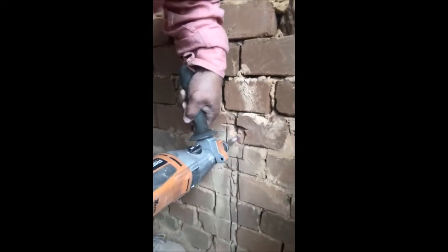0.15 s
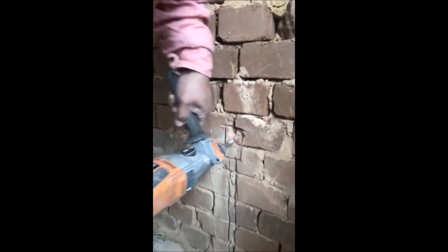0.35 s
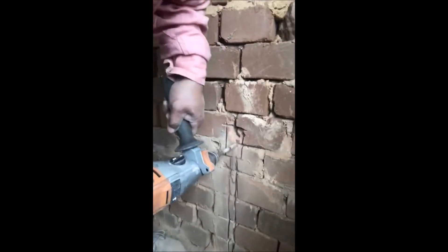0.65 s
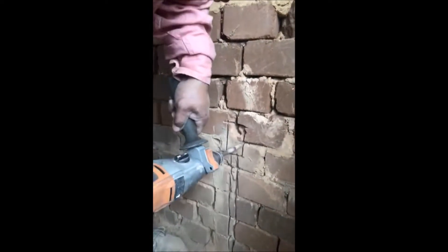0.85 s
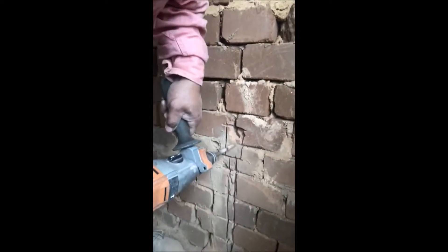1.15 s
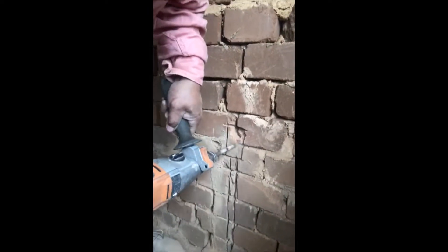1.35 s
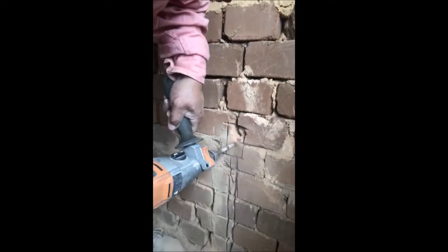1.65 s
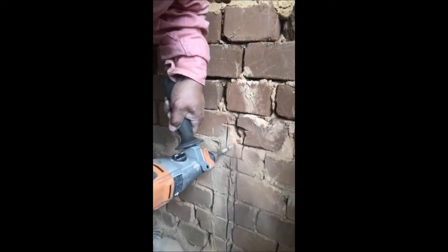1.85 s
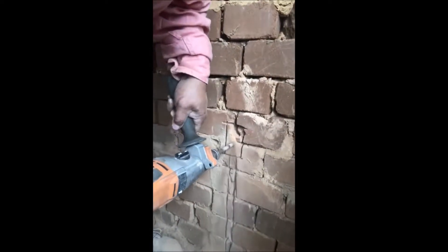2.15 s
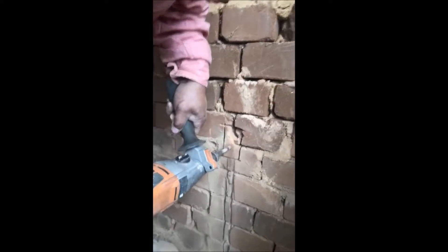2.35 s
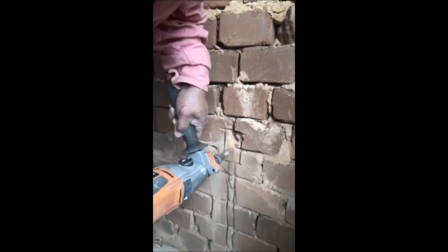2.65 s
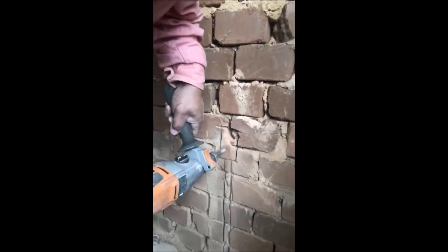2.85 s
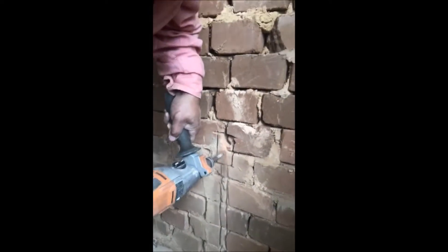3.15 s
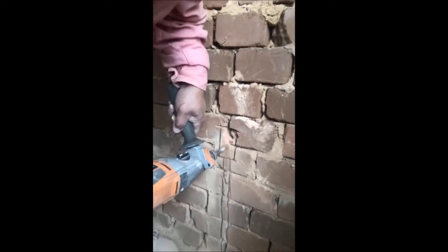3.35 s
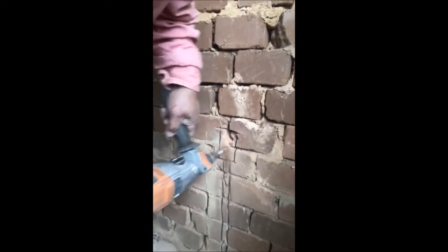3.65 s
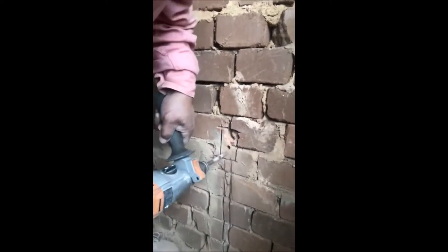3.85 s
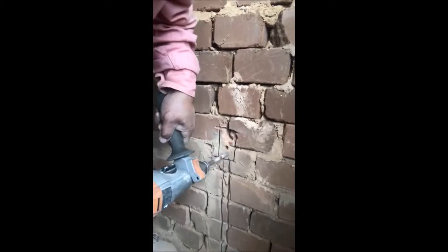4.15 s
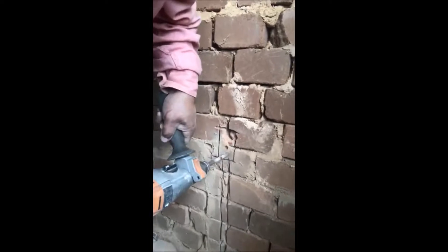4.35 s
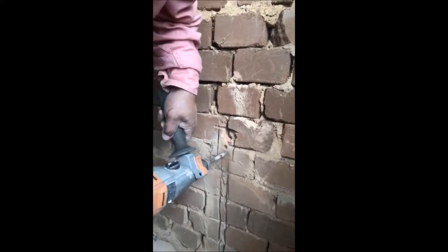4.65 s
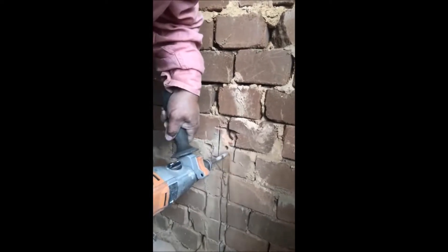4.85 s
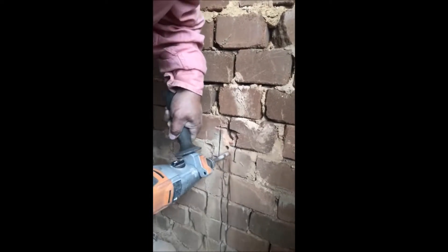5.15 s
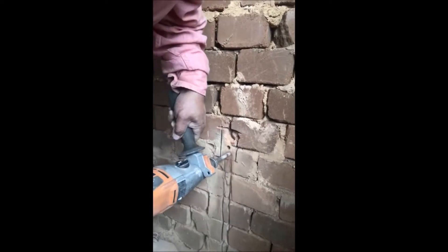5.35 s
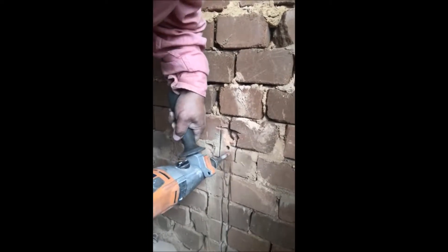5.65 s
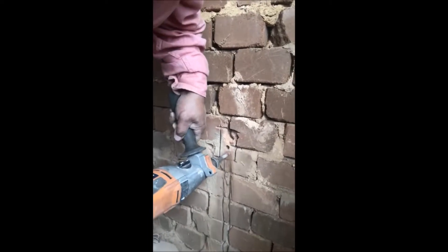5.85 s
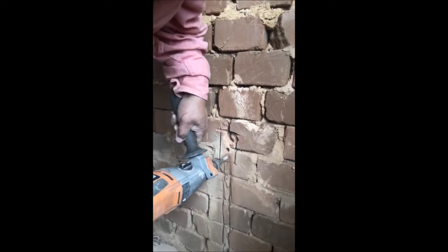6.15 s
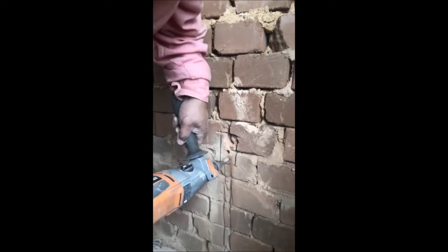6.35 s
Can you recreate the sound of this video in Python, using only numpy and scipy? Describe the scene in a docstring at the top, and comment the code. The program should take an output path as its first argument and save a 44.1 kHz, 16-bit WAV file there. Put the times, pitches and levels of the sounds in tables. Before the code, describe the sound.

A hammer drill bores into brick in harsh rattling bursts of steely clicks and grit, twice easing off to a free-running motor whine.

```python
"""A corded hammer drill bores into a brick wall, close to a small mono microphone.
The bit rattles in bursts of ringing steel clicks amid puffs of grit, about forty bursts a second in
steady boring. The armature sings in sine orders of its speed over coloured noise from housing, gears and
fan. Twice the bit is drawn back and the motor runs free. Hum, low rumble and a soft groan lie beneath."""
import sys
import numpy as np
from scipy import signal
from scipy.io import wavfile
from scipy.ndimage import uniform_filter1d

SR = 44100
rng = np.random.default_rng(int(sys.argv[2]) if len(sys.argv) > 2 else 0)


def makeup_ratio(level_db):
    """Linear amplitude ratio for a level in decibels (20 dB per factor of ten)."""
    decades = np.asarray(level_db, float) / 20
    return 10 ** decades


def store_wav(level_fs):
    """Save 16-bit WAV to argv[1]."""
    pcm = np.round(np.clip(np.atleast_2d(level_fs), -1, 1) * 32767)
    wavfile.write(sys.argv[1], SR, pcm.T.astype(np.int16))


N = 287091

# Single knocks as the bit bounces, rattles in parted bursts or grazes the hole: (time [s], strength [dB])
KNOCKS = [(0.0002, -11), (0.004, -7), (0.0094, -13), (0.0122, -10), (0.0153, -10), (0.0261, -7),
          (0.0286, -7), (0.0326, -11), (0.0438, -7), (0.0493, -6), (0.0532, -10), (0.0599, -7),
          (0.0639, -6), (0.07, -7), (0.0754, -6), (0.078, -6), (0.0808, -12), (0.0883, -5), (0.0922, -7),
          (0.1, -6), (0.1027, -6), (0.1104, -11), (0.113, -8), (0.1233, -6), (0.1259, -9), (0.1313, -13),
          (0.1353, -10), (0.1482, -6), (0.152, -7), (0.1549, -12), (0.1602, -12), (0.1717, -6),
          (0.1769, -10), (0.1847, -8), (0.2006, -6), (0.2032, -4), (0.2072, -8), (0.219, -6), (0.2215, -6),
          (0.228, -8), (0.2386, -6), (0.2491, -7), (0.2517, -12), (0.2558, -11), (0.2585, -10),
          (0.2727, -7), (0.2767, -7), (0.2794, -7), (0.2872, -12), (0.2897, -7), (0.3002, -6),
          (0.3054, -13), (0.3084, -11), (0.325, -6), (0.3362, -11), (0.5209, -11), (0.5465, -12),
          (0.5525, -14), (0.5581, -14), (0.5635, -15), (1.5134, -6), (1.5339, -7), (1.5367, -8),
          (1.5402, -7), (1.5606, -9), (1.5835, -5), (1.5886, -7), (1.6052, -4), (1.6096, -6), (1.6242, -7),
          (1.6283, -7), (1.6395, -5), (1.6536, -5), (1.6574, -4), (1.6612, -6), (1.6727, -6), (1.6784, -6),
          (1.6816, -3), (1.6919, -10), (1.6952, -5), (1.7099, -6), (1.7151, -8), (1.7277, -7), (1.7344, -8),
          (1.7469, -7), (1.7514, -7), (1.7566, -10), (1.7643, -9), (1.7695, -8), (1.7798, -10),
          (1.7826, -6), (1.7865, -6), (2.9138, -4), (2.924, -5), (2.9347, -11), (2.9436, -6), (2.9482, -6),
          (2.9681, -5), (2.9837, -9), (2.9908, -3), (2.9937, -12), (3.0149, -4), (3.0265, -13),
          (3.0304, -12), (3.0407, -5), (3.0538, -10), (3.064, -2), (3.1183, -14), (3.1337, -7),
          (3.1397, -10), (3.1627, -7), (3.1702, -4), (3.1943, -13), (3.2157, -10), (3.2195, -6),
          (3.3237, -7), (3.3319, -4), (3.364, -6), (3.3768, -3), (3.4094, -8), (3.4222, -5), (3.432, -11),
          (3.4534, -4), (3.4644, -12), (3.4769, -9), (3.5012, -4), (3.5123, -7), (3.5199, -6), (3.5236, -3),
          (3.5448, -7), (3.5475, -6), (3.5556, -11), (3.566, -3), (3.5695, -13), (3.5762, -12), (3.588, -5),
          (4.2704, -12), (4.4696, -5), (4.4805, -10), (4.4941, -10), (4.5093, -7), (4.518, -5),
          (4.5384, -11), (4.5578, -6), (4.5689, -6), (4.5718, -11), (4.5765, -4), (4.5793, -7),
          (4.5827, -6), (4.594, -5), (4.605, -11), (4.614, -4), (4.6291, -6), (4.6417, -7), (4.6476, -7),
          (4.6502, -10), (4.6541, -6), (4.6654, -7), (4.6697, -11), (4.6753, -4), (4.6864, -5),
          (4.6976, -4), (4.7088, -4), [5.3276, -6], [5.3314, -4], [5.3377, -3], [5.3427, -4], [5.3529, -6],
          [5.3584, -6], [5.3622, -5], [5.3667, -5], [5.3758, -7], [5.3795, -4], [5.3846, -4], [5.3896, -5],
          [5.4012, -5], [5.4045, -4], [5.4091, -3], [5.4138, -4], [5.4228, -7], [5.4266, -5], [5.4306, -4],
          [5.4386, -9], [5.4469, -4], [5.4521, -4], [5.4575, -4], [5.465, -9], [5.4701, -4], [5.4752, -8],
          [5.4789, -6], [5.4842, -3], [5.4893, -5], [5.4956, -3], [5.5022, -8], [5.5072, -4], [5.52, -4],
          [5.5324, -4], [5.5392, -4], [5.5483, -8], [5.5516, -4], [5.5599, -6], [5.5689, -5], [5.5798, -7],
          [5.5827, -6], [5.5873, -3], [5.596, -8], [5.5998, -3], [5.6037, -4], [5.6093, -5], [5.6191, -6],
          [5.6228, -7], [5.6268, -8], [5.6303, -5], [5.6357, -5], [5.6447, -4], [5.6537, -5], [5.6588, -5],
          [5.6641, -5], [5.6679, -4], [5.673, -6], [5.6781, -4], [5.6897, -4], [5.7001, -4], [5.7039, -5],
          [5.709, -5], [5.718, -4], [5.7247, -8], [5.7287, -5], [5.7412, -6], [5.7461, -7], [5.7518, -5],
          [5.7566, -3], [5.7669, -5], [5.773, -3], [5.7773, -4], [5.7822, -4], [5.7961, -5], [5.8015, -7],
          [5.804, -5], [5.8117, -5], [5.8168, -5], [5.8194, -12], [5.8232, -11], [5.8282, -5], [5.8434, -6],
          [5.8468, -5], [5.8495, -7], [5.853, -6], [5.8613, -11], [5.8639, -5], [5.868, -9], [5.8728, -7],
          [5.8797, -8], [5.8906, -6], [5.8944, -5], [5.8982, -12], [5.9021, -5], [5.9137, -6], [5.9185, -5],
          [5.9222, -6], [5.9277, -10], [5.9366, -12], [5.94, -5], [5.9452, -5], [5.9494, -7], [5.9545, -12],
          [5.9582, -4], [5.9648, -6], [5.97, -5], [5.9837, -5], [5.9888, -5], [5.995, -8], [6.0104, -6],
          [6.013, -4], [6.0179, -5], [6.0373, -6], [6.0398, -9], [6.0473, -6], [6.0587, -5], [6.0634, -9],
          [6.0701, -6], [6.0827, -4], [6.0863, -6], [6.0928, -5], [6.1118, -6], [6.1155, -6], [6.132, -5],
          [6.1353, -5], [6.1408, -5], [6.1524, -9], [6.1597, -6], [6.1698, -7], [6.1785, -11], [6.1812, -5],
          [6.1872, -6], [6.2046, -5], [6.209, -5], [6.2161, -5], [6.2201, -12], [6.2276, -6], [6.2326, -6],
          [6.24, -7], [6.2513, -7], [6.26, -7], [6.2726, -10], [6.2772, -6], [6.2824, -6], (6.3021, -5),
          (6.3074, -2), (6.3111, -4), (6.3287, -4), (6.3348, -5), (6.3461, -3), (6.3498, -4), (6.3585, -11),
          (6.3747, -4), (6.3796, -2), (6.3969, -5), (6.4018, -3), (6.4216, -6), (6.4427, -4), (6.4701, -4),
          (6.4751, -3), (6.4948, -11), (6.5, -4)]
# Blows: (time [s], strength [dB], extra ring of the free shank [dB], share of stroke in contact [0-1],
# extra ring of the bit tip [dB])
BLOWS = [(0, -6, 3, .9, -6), (.34, -6, 3, .65, -3), (1.5, -6, -14, 0.57, -4), (1.8, -6.5, -4.5, 0.98, -2.5),
         (2.1, -7, -2.5, 0.96, -1), (2.4, -5.5, 0.5, 0.85, -0.5), (2.8, -7.5, 2.5, 0.85, -1),
         (2.93, -5, 2, 0.41, 1), (3.6, -7, 0.5, 0.59, 2), (4.5, -6, -3, .6, 3), (4.7, -6.5, -16, 0.73, 0.5),
         (5.0, -6, -3, 0.91, -3), (5.4, -6.5, 1.5, .78, -1.5), (5.65, -5.5, 1.5, 0.8, -2.5),
         (5.8, -4, 3, 0.75, 1), (6.1, -6.5, 2.5, 0.54, -0.5), (6.3, -3.5, 0.5, 0.6, 0),
         (6.51, -5.5, -1, .3, 2.5)]
# The bit chatters with hardly a pause: (start [s], end [s])
RATTLES = [(1.79, 2.9), (4.715, 5.325)]
# Clearly parted bursts of the boring bit: (start [s])
BURST_STARTS = [1.844, 1.864, 1.966, 2.159, 2.242, 2.337, 2.3912, 2.4165, 2.4439, 2.4651, 2.487, 2.5103,
                2.5415, 2.561, 2.5881, 2.6154, 2.6449, 2.6826, 2.7137, 2.7303, 2.7601, 2.7928, 2.8124,
                2.839, 2.8612, 2.88, 4.7212, 4.7425, 4.7639, 4.8053, 4.8304, 4.8803, 4.9074, 4.9275, 4.951,
                4.9697, 4.9952, 5.0431, 5.0708, 5.0908, 5.1161, 5.1376, 5.181, 5.2115, 5.2298, 5.2552,
                5.2746, 5.3013]
# Ringing modes of bit, chuck and brick: (frequency [Hz], level [dB], t60 [s], swing over one stroke [dB],
# place in the stroke where the swing peaks [0-1])
STEEL_MODES = [(641, -4.5, 0.013, 1.5, .4), (2070, -9, 0.0097, 2.5, 0.03), (2354, -4.5, 0.0097, -0.3, 0.2),
               (2533, 0, 0.0092, 1.8, .22), (3135, -6, 0.016, 4.5, 0.29), (3226, -7.5, 0.029, 4.5, 0.37),
               (3855, -2.5, 0.0084, 1.5, 0.83), (4290, -3, 0.0078, 2.5, 0.83),
               (4550, -2, 0.0057, -0.5, 0.8), (5900, -5, 0.0058, 8, .41), (6330, -6, 0.0076, 7, 0.37),
               (8930, -5.5, 0.0041, 0.5, 0.2)]
# Armature: (time [s], mean speed [turns/s])
SPEED = [(0, 425), (.3, 424), (.5, 447), (.7, 424), (.88, 401), (1.1, 435), (1.65, 436), (1.8, 427),
         (2.2, 424), (2.7, 427), (3.0, 429), (3.6, 448), (4.05, 450), (5.0, 447), (5.6, 432), (5.75, 432),
         (6.3, 444), (6.51, 448)]
# Motor: (time [s], bit load [0-1], motor noise [dB], fourth-order whine [dB])
MOTOR = [(0, 0.7, -35, -42), (.32, 0.6, -34, -41), (.4, 0.17, -33, -37), (.55, 0.24, -32.5, -40),
         (.63, 0.03, -35.5, -53), (.9, 0.3, -34, -54), (1.06, 0.08, -31.5, -45), (1.3, 0.08, -29.8, -41),
         (1.47, 0.1, -28, -33.5), (1.52, 0.8, -28.5, -33), (1.62, 1, -28.5, -39), (1.8, 1, -36, -45),
         (2.8, 0.57, -33.5, -40.5), (2.97, 0.34, -32, -36.5), (3.6, 0.17, -32.5, -35.5),
         (4.05, 0, -30.5, -42), (4.45, 0.06, -29.5, -34.5), (4.7, 0.74, -33.5, -39), (5.2, 0.66, -34, -50),
         (5.85, 0.8, -32.5, -36), (6.25, 0.99, -32, -42), (6.51, 0.4, -30, -35)]
# Bit held hard against the brick: (start [s], end [s])
BORES = [(1.79, 2.93), (4.715, 6.295)]
# The second and third shaft orders sing: (start [s], end [s])
STEADY = [(1.05, 1.55), (3.1, 4.65)]
# Colour of the housing roar: (frequency [Hz], relative density [dB per Hz])
ROAR = [(800, -30), (1000, -3), (1120, 1), (1350, 3), (2600, -12.5), (3380, -35), (5720, -120)]
# Colour of the low drone: (frequency [Hz], relative density [dB per Hz])
DRONE = [(88, -72), (150, -21), (394, -8.5), (480, -3.5), (640, 0.5), (780, -2), (930, -6), (1150, -18)]
# Colour of the gear hiss: (frequency [Hz], relative density [dB per Hz])
GEARS = [(1120, -4.5), (1900, 1.5), (2300, -4), (2710, 1), (3000, -0.5), (3350, 0.1), (3800, -1.5),
         (4700, 1), (5450, -4), (6000, -4), (8000, -10.5), (10400, -58), (17600, -120)]
# Colour of the fan hiss: (frequency [Hz], relative density [dB per Hz])
FAN = [(4120, -10), (7000, 0), (9490, -2.5), (10000, -1.5), (11000, -6.5), (12000, -5.5), (13300, -7.5),
       (16000, -10.5)]
# Low rumble swells as the grip shifts: (middle [s], half width to 1/e [s], peak boost [dB])
SWELLS = [(0.519, 0.22, 5), (3.951, 0.25, 3)]
# Supply hum, running free at a motor noise of -31 dB: (frequency [Hz], level [dB rms])
HUM = [(60, -62), (120, -66), (240, -54)]
# Groan tones: (start frequency [Hz], end frequency [Hz])
GROAN_HZ = [(300, 268), (225, 198)]

# Striker and bit
TURNS_PER_STROKE = 10.545  # armature turns for one stroke of the striker
CONTACT_MIDDLE = .35  # middle of the contact, share of a stroke
RATTLE_GAP_S, GAP_SPREAD = .0047, .27  # median gap between clicks; its log spread
START_SPREAD, SHARE_SPREAD = .05, .05  # of burst starts; of the contact share; both in strokes
SIZE_SPREAD_DB = 1.3  # from click to click
PARTING_S, SHORTEST_S = .005, .002  # pause kept before a parted burst; no burst is cut shorter than this
SHANK_HZ, TIP_ABOVE_HZ = 3170, 5500
PHASE_SPREAD = .45  # radians by which a mode's start differs from click to click
CRACK_DB, CRACK_S = -11.5, .00006  # bare pressure spike of each impact; its half width
SHAKE_DB = 7.5  # swing of the motor sound between contact and return, at full load

# Motor layers: (dB above the motor noise running free, dB lost at full load)
UNBALANCE, HOUSING, GEARBOX = (-8, 7), (-0.29, 2.53), (3.83, 2)
BLADES, HANDS = (-3.5, 16), (-22, 5.5)
SECOND_DB, THIRD_DB = -6.5, 0  # orders, relative to the unbalance level
MESH_ORDER, MESH_DB, MESH_WAVER_DB = 1.803, -43.5, 2  # gear tooth tone: order, mean level, slow wavering
DRONE_DB, DRONE_FOLLOWS = -37.5, .7  # level at a motor noise of -31.5 dB; share of its changes taken over
GEARS_DB_PER_TURN, REFERENCE_SPEED = -0.01, 441.5  # hiss change per turn/s above this speed [turns/s]
GRAIN_DB = 0.86  # fast unevenness of the gear hiss
GROAN_START_S, GROAN_END_S, GROAN_DB = 3.5, 3.7, -45


def seconds():
    """Time of every sample in seconds."""
    return np.arange(N) / SR


def read(points, hz):
    """Spectrum in dB on a log-frequency axis."""
    f, value = np.transpose(points)
    return np.interp(np.log(hz + 1), np.log(f + 1), value, left=-90, right=-90)


def columns(rows):
    """Every column of a table after the time, as a curve over all samples."""
    s, *rest = np.transpose(rows)
    return [np.interp(seconds(), s, c) for c in rest]


def evened(x):
    """Scales to rms 1."""
    return x / np.sqrt(np.mean(x ** 2) + 1e-20)


def drift(span_s):
    """Smoothed chance of rms 1, slower for a longer span."""
    width = max(int(span_s * SR), 1)
    once = uniform_filter1d(rng.standard_normal(N), width)
    return evened(uniform_filter1d(once, width))


def noise(points, patchy_db):
    """Noise of rms 1: random short-time spectra of a given colour with drifting patches."""
    frames, hz = N // 256 + 5, np.fft.rfftfreq(1024, 1 / SR)
    real, imaginary, patches = rng.standard_normal((frames, 513, 3)).T
    patches = uniform_filter1d(patches, size=8, axis=0)
    patches = evened(uniform_filter1d(patches, size=8, axis=1))
    spectra = (real + 1j * imaginary) * makeup_ratio(read(points, hz)[:, None] + patchy_db * patches)
    return evened(signal.istft(spectra, nperseg=1024, noverlap=768)[1][:N])


def during(spans):
    """1 inside the spans, 0 outside, with soft edges."""
    t = seconds()
    inside = sum(1. * (t > start) * (t < end) for start, end in spans)
    return uniform_filter1d(inside, size=2000)


def bit_load():
    """Load on the bit, 0 running free to 1 pressed hard."""
    return np.clip(columns(MOTOR)[0], 0, 1)


def follower(rule):
    """Level in dB of a layer tied to the motor noise and damped by load."""
    above_db, lost_db = rule
    return columns(MOTOR)[1] + above_db - lost_db * bit_load()


def stroke_count():
    """Strokes of the striker made so far, geared down from the armature, at every sample."""
    return np.cumsum(columns(SPEED)[0]) / SR / TURNS_PER_STROKE


def impacts():
    """Bursts of clicks once a stroke in the rattling spans, plus single knocks: sample places and sizes."""
    strokes, t = stroke_count(), seconds()
    number = np.arange(int(strokes[-1]))
    middle_s = np.interp(number + CONTACT_MIDDLE, strokes, t)
    stroke_s = np.gradient(middle_s)
    blow_db, _, share, _ = (np.interp(middle_s, t, c) for c in columns(BLOWS))
    luck = rng.standard_normal((len(number), 8))
    length_s = np.clip(share + SHARE_SPREAD * luck[:, 7], .05, 1) * stroke_s
    gaps_s = RATTLE_GAP_S * np.exp(GAP_SPREAD * luck[:, 1:7])
    into_s = np.cumsum(gaps_s, axis=1) - gaps_s[:, :1]
    start_s = middle_s + START_SPREAD * stroke_s * luck[:, 0] - length_s / 2

    # a stroke close to a parted burst starts exactly with it
    parted_s = np.array(BURST_STARTS)
    nominal_s = middle_s - share * stroke_s / 2
    nearest_s = parted_s[abs(nominal_s[:, None] - parted_s).argmin(axis=1)]
    parted = abs(nearest_s - nominal_s) < stroke_s / 2
    start_s = np.where(parted, nearest_s, start_s)
    room_s = np.diff(start_s, append=N / SR) - PARTING_S * np.append(parted[1:], 0)
    length_s = np.minimum(length_s, np.maximum(room_s, SHORTEST_S))

    click_s = start_s[:, None] + into_s
    size = makeup_ratio(blow_db[:, None] + SIZE_SPREAD_DB * rng.standard_normal(click_s.shape))
    size = size * np.clip((length_s[:, None] - into_s) / .002, 0, 1)  # clicks weaken in the last 2 ms
    size = size * sum((click_s > start) & (click_s < end) for start, end in RATTLES)
    knock_s, knock_db = np.transpose(KNOCKS)
    all_s, all_sizes = np.append(click_s, knock_s), np.append(size, makeup_ratio(knock_db))
    return np.clip(np.round(all_s * SR).astype(int), 0, N - 1), all_sizes


def ringing_steel(at, sizes):
    """Decaying modes of bit, chuck and brick, each struck with its own strength and phase."""
    _, shank_db, _, tip_db = (c[at] for c in columns(BLOWS))
    t, steel, strokes = np.arange(2000) / SR, np.zeros(N), stroke_count()[at]
    luck = rng.standard_normal((len(at), len(STEEL_MODES), 2))
    for k, (hz, db, t60, swing_db, best) in enumerate(STEEL_MODES):
        own_db = 1.6 * luck[:, k, 0]
        own_db += shank_db * (abs(hz - SHANK_HZ) < 200) + tip_db * (hz > TIP_ABOVE_HZ)
        own_db += swing_db * np.cos(2 * np.pi * (strokes - best))  # the striker's place decides which parts ring
        strikes = np.zeros(N, complex)
        np.add.at(strikes, at, sizes * makeup_ratio(own_db) * np.exp(1j * PHASE_SPREAD * luck[:, k, 1]))
        rise = (1 - np.exp(-t * hz ** 2 / 707.0)) ** 2  # heavy, low modes are slow to get going
        ring = rise * makeup_ratio(db - 60 * t / t60) * np.exp(2j * np.pi * hz * t)
        steel += signal.oaconvolve(strikes, ring)[:N].imag
    return steel


def crushed_grit(train, lag):
    """A puff of coloured noise around each impact: scrape before, crumbs after."""
    shape = np.where(lag < 0, .25 * np.exp(lag / .0015), np.exp(-lag / .0012))
    grit = noise([(200, -8.5), (600, -21), (1500, -30.0), (2300, -2.0), (4300, 4.0), (6300, 3.5),
                  (8000, -11), (15500, -34)], patchy_db=1.5)
    return signal.oaconvolve(train, shape, "same") * grit


def pressure_crack(train, lag):
    """The bare pressure spike of each impact, dipping below zero on both sides."""
    u = (lag / CRACK_S) ** 2
    return signal.oaconvolve(train, (1 - u) * np.exp(-u / 2), "same")


def hammer(at, sizes):
    """Each impact rings the steel, crushes grit and cracks; small parts radiate no bass."""
    train, lag = np.bincount(at, sizes, N), np.arange(-400, 401) / SR
    blows = makeup_ratio(-0.8) * ringing_steel(at, sizes) + makeup_ratio(-5.0) * crushed_grit(train, lag)
    blows += makeup_ratio(CRACK_DB) * pressure_crack(train, lag)
    return signal.sosfilt(signal.butter(2, 140, "high", fs=SR, output="sos"), blows)


def wall(x):
    """A faint first arrival, the stronger sound off the brick face, and two quick reflections."""
    taps = np.zeros(600)
    for s, share in [(0, 0.074), (.0005, 0.35), (.0021, -0.1), (.0048, -0.15)]:
        taps[int(np.clip(s * SR, 0, 599))] += share
    return signal.oaconvolve(x, taps)[:N]


def contact(at, sizes):
    """Near 1 while the bit rattles against the brick, near 0 as the striker swings back."""
    train = np.bincount(at, np.clip(sizes / .1, 0, 1), N)
    return np.clip(signal.oaconvolve(train, np.hanning(440), "same"), 0, 1)


def motor_tones():
    """Shaft orders of a wavering armature speed, and a gear tooth tone while the bit bores."""
    load, whine_db, unbalance_db = bit_load(), columns(MOTOR)[2], follower(UNBALANCE)
    waver = (.002 + .001 * load) * drift(.03)
    angle = 2 * np.pi * np.cumsum(columns(SPEED)[0] * (1 + waver)) / SR

    def tone(order, db):
        """Sine at a multiple of the shaft speed; higher orders flutter more."""
        flutter_db = .7 * (order - 1) * drift(0.0065)
        return np.sqrt(2) * makeup_ratio(db + flutter_db) * np.sin(order * angle)

    out = tone(1, unbalance_db + 6.8 * load * drift(0.01)) + tone(4, whine_db)
    out += during(BORES) * tone(MESH_ORDER, MESH_DB + MESH_WAVER_DB * drift(.04))
    return out + during(STEADY) * (tone(2, unbalance_db + SECOND_DB) + tone(3, unbalance_db + THIRD_DB))


def free_throb():
    """Throb at twice the supply frequency, full when running free and gone at full load."""
    return (1 - bit_load()) * np.cos(2 * np.pi * 120 * seconds())


def housing_roar():
    """Broad roar of the housing over a low drone, both throbbing."""
    throb = free_throb()
    drone_db = DRONE_DB + DRONE_FOLLOWS * (columns(MOTOR)[1] + 31.5)
    roar = makeup_ratio(follower(HOUSING) + 0.76 * throb) * noise(ROAR, patchy_db=2.0)
    return roar + makeup_ratio(drone_db + 0.9 * throb) * noise(DRONE, patchy_db=1.8)


def gear_hiss():
    """Grainy gear noise that grows very slightly as the armature slows."""
    gear_db = follower(GEARBOX) + GEARS_DB_PER_TURN * (columns(SPEED)[0] - REFERENCE_SPEED)
    return makeup_ratio(gear_db + 0.36 * free_throb() + GRAIN_DB * drift(0.0012)) * noise(GEARS, patchy_db=1.27)


def fan_hiss():
    """Broad fan hiss at the motor noise level, and a narrow blade band that load damps."""
    fan = makeup_ratio(columns(MOTOR)[1] + .5 * free_throb()) * noise(FAN, patchy_db=3.0)
    blades = noise([(10000, -13), (10700, -0.5), (11300, -5.5), (11900, -9)], patchy_db=1.5)
    return fan + makeup_ratio(follower(BLADES)) * blades


def hand_rumble():
    """Low rumble that swells as the grip shifts."""
    swell_db = sum(db * np.exp(-((seconds() - s) / half_s) ** 2) for s, half_s, db in SWELLS)
    rumble = noise([(20, -11), (60, 17.0), (130, -3), (260, 7.0), (330, -30)], patchy_db=2.0)
    return makeup_ratio(follower(HANDS) + swell_db) * rumble


def supply_hum():
    """Supply frequency and two multiples, swelling with the motor noise and weaker under load."""
    t = seconds()
    hum = sum(np.sqrt(2) * makeup_ratio(db) * np.sin(2 * np.pi * hz * t) for hz, db in HUM)
    return (1 - 0.68 * bit_load()) * makeup_ratio(columns(MOTOR)[1] + 31.0) * hum


def groan():
    """Two soft tones that sink together as the bit slides free."""
    u = np.clip((seconds() - GROAN_START_S) / (GROAN_END_S - GROAN_START_S), 0, 1)
    tones = sum(np.sin(2 * np.pi * np.cumsum(a + (b - a) * u) / SR) for a, b in GROAN_HZ)
    return makeup_ratio(GROAN_DB) * np.sqrt(np.abs(np.sin(np.pi * u))) * (u < 1) * tones


def scene():
    """The drill reaches one microphone, on both channels; under load the motor is loudest in contact."""
    at, sizes = impacts()
    shake_db = SHAKE_DB * bit_load() * (contact(at, sizes) - 0.4349)
    motor = motor_tones() + housing_roar() + gear_hiss() + fan_hiss() + hand_rumble() + supply_hum()
    mono = wall(hammer(at, sizes)) + makeup_ratio(shake_db) * motor + groan()
    return np.array([mono, mono])


def roll_off(x):
    """The treble ends steeply here."""
    return signal.sosfilt(signal.butter(12, 16970, fs=SR, output="sos"), x)


def record(dry):
    """A fast limiter pulls everything down at each loud impact; then bass cut and band limit."""
    peak_db = 20 * np.log10(abs(dry[0]) + 1e-6)
    fall_db = np.arange(N) * 650. / SR  # recovers 650 dB per second
    held_db = np.maximum.accumulate(peak_db + fall_db) - fall_db
    over_db = np.maximum(held_db + 6.2, 0)  # threshold -6.2 dB
    ahead_db = np.roll(uniform_filter1d(over_db, size=32), shift=-16)  # it looks a little ahead
    limited = dry / makeup_ratio(ahead_db)
    bass_cut = signal.sosfilt(signal.butter(2, 56, "high", fs=SR, output="sos"), limited)
    edge = signal.firwin(1023, 15800, window=("kaiser", 9), fs=SR)
    finished = signal.oaconvolve(bass_cut, edge[None], "same")
    return roll_off(finished)


dry = scene()
out = record(dry)
store_wav(out)
```